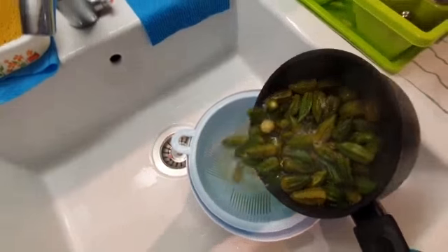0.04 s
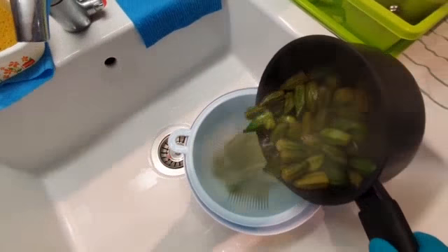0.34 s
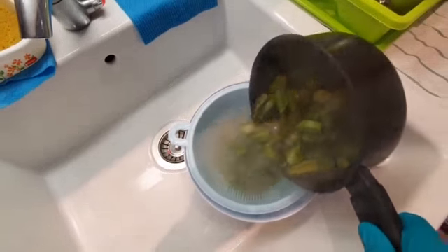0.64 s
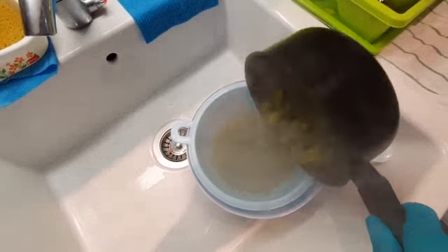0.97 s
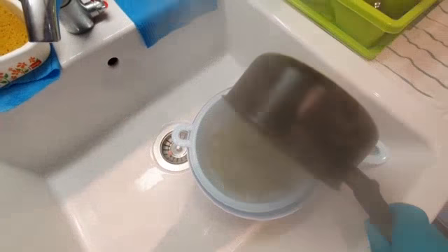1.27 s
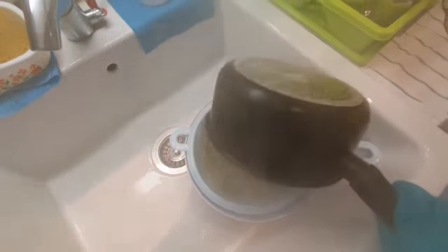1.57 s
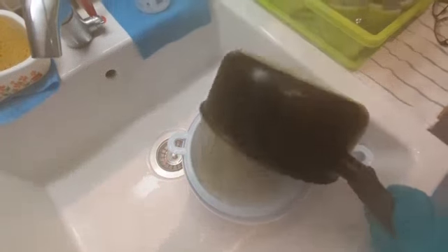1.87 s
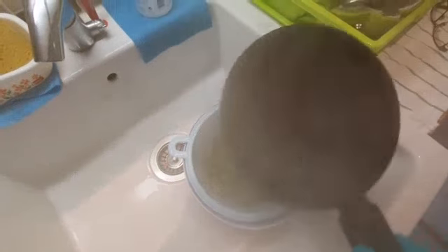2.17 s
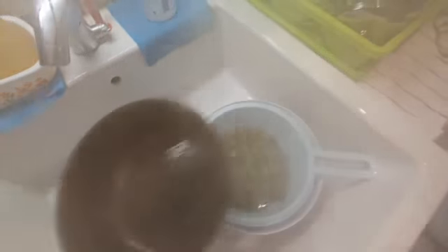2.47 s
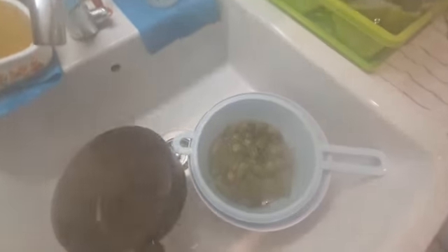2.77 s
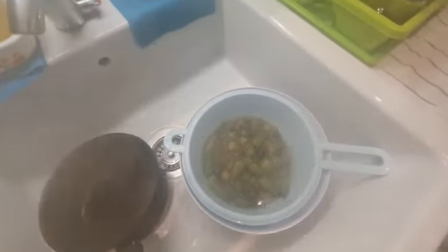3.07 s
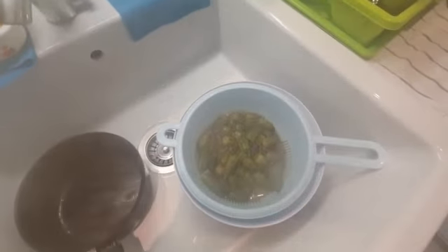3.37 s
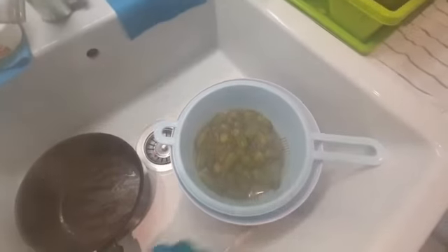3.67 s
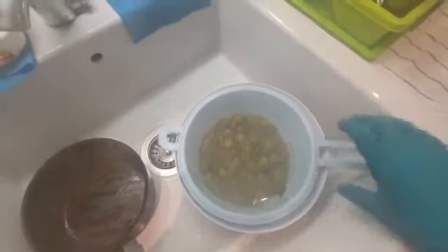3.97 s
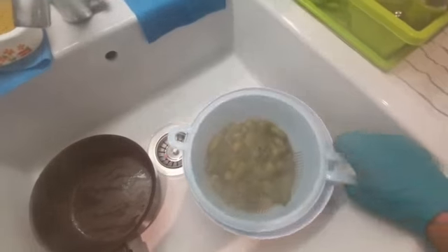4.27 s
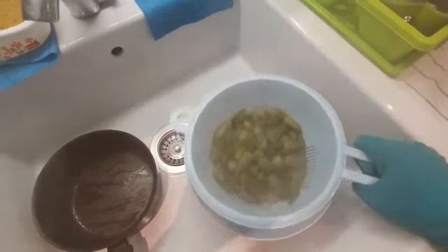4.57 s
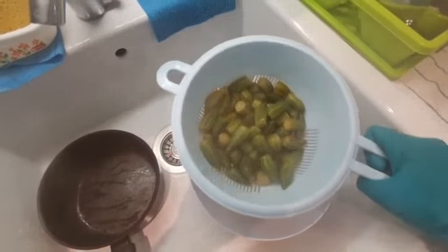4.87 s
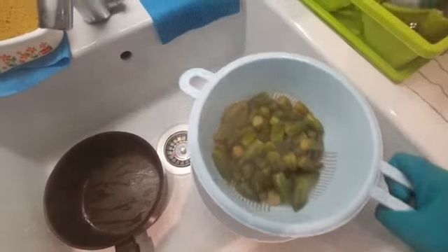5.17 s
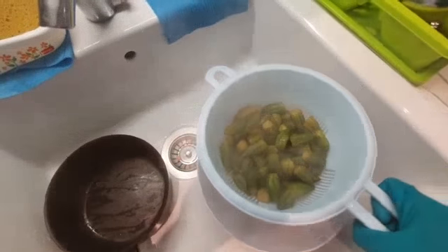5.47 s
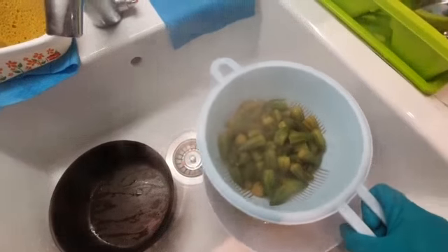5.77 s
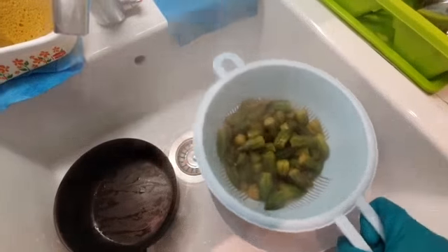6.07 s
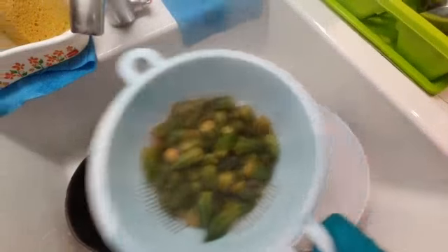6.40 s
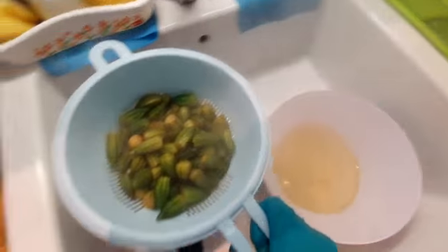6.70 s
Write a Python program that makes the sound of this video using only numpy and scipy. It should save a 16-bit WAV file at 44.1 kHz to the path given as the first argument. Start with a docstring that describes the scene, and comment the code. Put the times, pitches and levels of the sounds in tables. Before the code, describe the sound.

A wet, sloppy pour drums into plastic, followed by one loud pan clang and hollow plastic knocking and rattling with more dribbling water.

```python
"""A kitchen sink: hot water and boiled vegetables slide from a pan into a plastic colander, splashing,
bubbling and drumming in the bowl beneath. The hot pan hisses faintly as it swings aside and is set down
with a clang. The colander knocks on the bowl as it is lifted and shaken, and more water patters out.
The basin throws back close echoes; a small kitchen hums behind."""
import sys
import numpy as np
from scipy import signal
from scipy.fft import rfft, irfft
from scipy.io import wavfile
from scipy.ndimage import uniform_filter1d

SR = 44100
rng = np.random.default_rng(int(sys.argv[2]) if len(sys.argv) > 2 else 0)


def store_wav(level_fs):
    """Save 16-bit WAV to argv[1]."""
    pcm = np.round(np.clip(np.atleast_2d(level_fs), -1, 1) * 32767)
    wavfile.write(sys.argv[1], SR, pcm.T.astype(np.int16))


N = 297234
TIME = np.arange(N) / SR
SIDE = np.array([[1], [-1]])  # opposite polarity left and right
DRUM_LOW_HZ = 267  # the bowl radiates little below this

# EQ curves of splashing, the drummed bowl, fine spray and thudding vegetables: f/Hz, level/dB
SPLASH_EQ = [(530, -40.5), (900, -19), (1050, -23), (1180, -11.5), (1630, 0), (1770, -4.5), (2180, -8.5),
             (2750, -4), (3400, -5.5), (5600, -19.5), (7000, -21), (9100, -54), (15400, -120)]
DRUM_EQ = [(76, -42), (130, 2.5), (215, -8), (295, -9), (328, -21), (421, -9), (506, -2.5), (562, -0.5),
           (690, 2.5), (884, -20.5), (1300, -10), (1690, -38.5), (2860, -120)]
SPRAY_EQ = [(2940, -19.5), (5000, -5), (6930, -7), (7900, 0.5), (9010, 1.5), (11800, -7), (14200, -7),
            (16000, -11.5)]
THUD_EQ = [(110, -15.5), (170, 1), (230, -3.5), (300, -2.5), (420, -6.5), (600, -20.5), (1500, -59)]


def undb(db):
    """Decibels to gain."""
    return 10 ** (np.asarray(db) / 20)


def unit(x):
    """Scale to rms 1."""
    return x / np.sqrt(np.mean(x ** 2))


def fade(t60, t):
    """A decay of 60 dB in t60 seconds."""
    return np.exp(-np.log(1000) * t / max(t60, 1e-4))


def add(out, s, x):
    """Mix a short stereo sound in at time s."""
    i = max(int(s * SR), 0)
    out[:, i:i + x.shape[1]] += x[:, :N - i]


def through(x, response):
    """Pass a sound through an impulse response."""
    return signal.fftconvolve(np.atleast_2d(x), np.atleast_2d(response), axes=1)[:, :x.shape[-1]]


def highpass(x, hz, order=2):
    """Roll off the lows."""
    return signal.sosfilt(signal.butter(order, hz, "high", fs=SR, output="sos"), x)


def lowpass(x, hz, order=2):
    """Roll off the highs."""
    return signal.sosfilt(signal.butter(order, hz, fs=SR, output="sos"), x)


def colour(x, points, size=4096):
    """Minimum-phase EQ of unit power through points of f/Hz, level/dB."""
    hz, db = np.transpose(points)
    bin_hz = np.arange(size // 2 + 1) * SR / size
    gain = undb(np.interp(np.log(bin_hz + 1), np.log(hz), db))
    cepstrum = irfft(np.log(gain))
    cepstrum[1:size // 2] *= 2
    cepstrum[size // 2 + 1:] = 0
    response = irfft(np.exp(rfft(cepstrum)))
    return through(x, response / np.linalg.norm(response))


def sides(left_db):
    """Stereo gains with the left channel left_db above the right."""
    return undb(SIDE * left_db / 2)


def walk(rate):
    """Smooth random wander of rms 1, with rate steps a second."""
    k = int(SR / rate)
    steps = np.repeat(rng.standard_normal(N // k + 1), k)
    return unit(uniform_filter1d(uniform_filter1d(steps, k), k)[:N])


def ring(modes, apart_hz, tilt_db=0, length=1, size=36000, waver=None, balance=None):
    """Struck modes, tilted by tilt_db an octave; left and right part in phase, fully at apart_hz."""
    t, out = TIME[:size], 0
    for hz, db, t60 in modes:
        skew = min(hz / apart_hz, 1) * np.pi / 4 * rng.choice([-1, 1]) * SIDE
        clock = t
        if waver is not None:
            depth, rate = waver
            wander = np.interp(t * rate, np.arange(100), rng.standard_normal(100))
            clock = t + depth * np.cumsum(wander) / SR
        place = 1 if balance is None else sides(np.interp(hz, *np.transpose(balance)))
        envelope = undb(db + tilt_db * np.log2(hz / 1e3)) * fade(t60 * length, t)
        out = out + place * envelope * np.sin(2 * np.pi * hz * clock + skew)
    return out


def burst(t60, like, size=24000):
    """A decaying noise burst, from wide (like=0) to mono (like=1)."""
    mid, side = rng.standard_normal((2, size))
    return (mid + (1 - like) * side * SIDE) * fade(t60, TIME[:size])


def drops(rate, spread_db, scatter):
    """Random impacts, a few much harder than the rest, scattered from left to right."""
    chance, size = rng.random(N), rng.exponential(size=N)
    sign, place = rng.choice([-1, 1], N), rng.standard_normal(N)
    hits = (chance < rate / SR) * sign * undb(spread_db * np.minimum(size, 4))
    local_rms = np.sqrt(np.maximum(uniform_filter1d(hits ** 2, SR // 8), 1e-3))
    return hits / local_rms * (1 + scatter * place * SIDE)


def kitchen(hum_hz=48.3, drone_hz=95.1):
    """Room tone, a motor hum and a low, wavering drone with its rumble."""
    # room tone: f/Hz, level/dB
    room_eq = [(15, -40), (25, -12), (92, -2.5), (111, -2), (175, -21), (229, -13.5), (373, -28),
               (531, -30), (1130, -38.5), (1560, -34), (2220, -53.5), (3160, -43), (5430, -65.5),
               (9840, -52.5), (16000, -63.5)]
    # drone fader, one list before and one after the pan is set down: t/s, level/dB
    drone_fader = [
        [(0.0, -43), (0.33, -51.5), (0.83, -42), (1.68, -45), (2.42, -42), (2.52, -45), (3.4, -48.5)],
        [(4.05, -51), (4.52, -58), (4.69, -57), (4.99, -55), (5.35, -53.5), (6.02, -47.5), (6.74, -50)],
    ]
    rumble_eq = [(30, -37), (65, -6.5), (100, 2), (130, -18.5), (300, -25.5), (900, -41.5),
                 (3000, -65.5)]
    mid, side = rng.standard_normal((2, N))
    width = highpass(colour(side, room_eq), hz=330, order=1) * SIDE
    air = undb(-51.7 + .8 * walk(6.5)) * (colour(mid, room_eq) + width)
    wavering_hz = drone_hz + 4 * walk(4) + 2.45 * walk(15)
    drone = np.sin(2 * np.pi * np.cumsum(wavering_hz) / SR) * undb(5.5 + 2.5 * walk(14))
    rumble = undb(1) * colour(rng.standard_normal(N), rumble_eq)
    hum = undb(-48) * np.sin(2 * np.pi * hum_hz * TIME)
    fader = undb(np.interp(TIME, *np.concatenate(drone_fader).T))
    return air + hum + fader * (drone + rumble)


def flows():
    """Splash, drum and spray envelopes: each gush swells, sags as the water runs out, then dies."""
    # first water over the lip, main pour, dregs, lifted colander draining: start/s, rise/s, end/s,
    # level/dB, sag/(dB/s), release/(dB/s), drum/dB and spray/dB relative to the splash
    gushes = [(-0.03, 0.027, 0.51, -43, 11, 152.5, -7, -10),
              (.44, 0.064, 1.37, -31.5, 16, 54.5, -1.5, -14.5),
              (1.51, 0.021, 1.794, -52.5, 3.5, 74.5, 7.5, -5),
              (5.058, 0.082, 5.464, -43, 8, 37.5, 8.5, -9.5)]
    splash = drum = spray = 0
    for start, rise, end, db, sag, release, drum_db, spray_db in gushes:
        swell = np.clip((TIME - start) / rise, 0, 1)
        poured_s = np.clip(TIME - start, 0, end - start)
        flow = swell * undb(db - sag * poured_s - release * np.maximum(TIME - end, 0))
        splash = splash + flow
        # as water collects in the bowl, drumming and spray gain on the splashing
        drum = drum + flow * undb(drum_db + 4 * poured_s)
        spray = spray + flow * undb(spray_db + 9.5 * poured_s)
    return splash, drum, spray


def bubbles(low_hz, high_hz, cycles, glide, spread_db, count=2200, size=1200):
    """Trapped air rings and rises in pitch as it nears the surface; more cycles give a longer ring."""
    out, t = np.zeros((2, N)), TIME[:size]
    for when, pitch, strength, place, lag in rng.random((count, 5)):
        hz = low_hz * (high_hz / low_hz) ** pitch
        age = t * hz / cycles
        phase = 2 * np.pi * hz * t * (1 + glide * np.minimum(age, 2))
        wave = np.sin(phase + (2 * lag - 1) * SIDE) * fade(0.52, age)
        gain = undb(-spread_db * np.log(strength + 0.029))
        add(out, when * N / SR, wave * gain * sides(10 * (place - .5)))
    return unit(out)


def water(splash, drum, spray):
    """The stream splashes, bubbles, gurgles and drums in the bowl and throws spray over a faint crackle."""
    # a faint, fine treble crackle swells and fades: fullest t/s, level/dB, rise/(dB/s), fall/(dB/s)
    crackle_swells = [(2.349, -72, 7.5, 15), (5.3, -59.5, 18.5, 15)]
    surge = undb(walk(30) - 1.5)  # the stream breaks into gouts
    splash, drum, spray = splash * surge, drum * surge, spray * surge
    patter = undb(-1.5) * colour(drops(rate=420, spread_db=2.5, scatter=1), SPLASH_EQ)
    fizz = undb(-4.5) * bubbles(1210, 3905, cycles=34, glide=0.064, spread_db=7.5)
    gurgle = undb(-4.5) * bubbles(474.5, 1270, cycles=13, glide=0.1, spread_db=3, count=700, size=2400)
    drumming = colour(drops(rate=530, spread_db=5, scatter=0.12), DRUM_EQ)
    drumming = undb(-1) * highpass(drumming, DRUM_LOW_HZ)
    thuds = undb(-15.5) * colour(drops(rate=73, spread_db=3.5, scatter=0.15), THUD_EQ)
    mist = undb(-1) * colour(drops(rate=280, spread_db=3, scatter=1), SPRAY_EQ)
    swell = sum(undb(db - np.maximum(rise * (s - TIME), fall * (TIME - s)))
                for s, db, rise, fall in crackle_swells)
    crackle = swell * undb(-4) * colour(drops(rate=640, spread_db=3.5, scatter=1), SPRAY_EQ)
    return splash * (patter + fizz + thuds) + drum * (gurgle + drumming) + spray * mist + crackle


def contacts(rebound_db=-3.5, rattle_gap_s=.016):
    """Knocks, ever weaker rebounds and loose rattle, as t/s, level/dB, click/dB, tilt/(dB/octave)."""
    # colander on bowl: t/s, level/dB, relative click/dB, tilt/(dB/octave), rebounds, rebound gap/s
    hits = [(0.048, -25.5, -11, -1, 0, 0), (1.713, -28, -22, 6, 0, 0), (1.766, -23.5, -17, 1.5, 0, 0.0014),
            (3.807, -2.5, -35.5, -3.5, 0, 0), (3.828, -19, -13, -1, 1, 0.02),
            (4.593, -25.5, -16, 3, 0, 0.0018), (4.61, -20.5, 0.5, -11, 0, 0), (4.670, -12, -15, 4, 0, 0),
            (4.7683, -11, -10.5, 8, 1, .008), (4.782, -5, -24, 0, 0, 0), (4.812, -4.5, -25, 4, 1, 0.0096),
            (4.849, -11, -22, -5.5, 0, 0), (4.862, -1.5, -24, 4, 0, 0.0022),
            (4.893, -5.5, -25, 1, 1, 0.0047), (4.944, -4.5, -23, -3, 0, 0), (4.966, -10, -19, -2, 1, .0055),
            (5.121, -15.5, -17, -10, 0, 0.0046), (5.173, -12, -11, -7, 0, 0), (5.198, -10, -6, 4, 0, 0),
            (5.743, -28, -39, -11, 0, 0), (5.902, -6, -3.5, -2.5, 0, 0.0032),
            (5.917, -3.5, -33, -7, 1, .014), (5.954, -2.5, -22, -1.5, 0, 0),
            (5.963, -3.5, -25.5, -4, 1, 0.0074), (6.076, -11, -21.5, -5, 0, 0.0041),
            (6.091, -11.5, -24, -7, 1, .008), (6.130, -16.5, -21, 1.5, 1, 0.012),
            (6.533, -25, -30.5, 2.5, 1, 0.012), (6.569, -23.5, -31, 1, 1, 0.016), (6.6, -25, -27, -6, 0, 0),
            (6.62, -23.5, -26, 3.5, 1, 0.018)]
    # the loose colander rattling on: start/s, end/s, level/dB
    rattles = [(4.771, 5.02, -24.5), (5.911, 6.02, -21.5), (6.073, 6.19, -32.5)]
    blows = [(s + k * gap, db + k * rebound_db, click_db, tilt_db)
             for s, db, click_db, tilt_db, rebounds, gap in hits for k in range(rebounds + 1)]
    for start, end, db in rattles:
        gaps, sizes = rng.random((40, 2)).T
        times = start + np.cumsum(rattle_gap_s * (.5 + gaps))
        blows += [(s, db + 3 * (2 * size - 1), -14.5, -1) for s, size in zip(times, sizes) if s < end]
    return blows


def knocks():
    """Plastic on plastic: a click, a few hollow cycles of the bowl, and the basin booming underneath."""
    # bowl modes, base and wall swinging against each other: f/Hz, level/dB, t60/s, polarity
    bowl_modes = [(390.4, -30, 0.24, 1), (524, -9.5, 0.075, 1), (562.7, -1.5, 0.042, 1),
                  (640, -10, 0.042, -1), (684, -6, 0.06, -1), (676, -24.5, 0.22, -1), (941, -16.5, 0.06, 1),
                  (1078, -17.5, 0.059, -1), (1252, -21.5, 0.043, 1)]
    # the bowl rings lower and longer under the colander's full weight: t/s, pitch ratio, decay ratio
    bowl_load = [(4.9, 1.005, 1.06), (5.9, .985, 1.61)]
    # basin modes: f/Hz, level/dB, t60/s
    basin_modes = [(86, 2, 0.23), (103.8, -1.5, 0.38), (145, -19, 0.77), (161.6, -2, 0.11)]
    # contact click: f/Hz, level/dB
    click_eq = [(300, -15), (1000, 3.5), (1700, 3), (2600, -2), (3500, -4.5), (5000, -22), (9000, -27.5),
                (16000, -38)]
    # weight landing on the basin (last vegetables, pan tipping flat, full colander): t/s, level/dB
    landings = [(1.888, -28.5), (3.822, -15), (5.905, -21.5), (6.09, -30.5), (6.611, -29.5)]
    out, t = np.zeros((2, N)), TIME[:18000]
    basin = ring(basin_modes, apart_hz=2010, size=len(t)) * (1 - fade(0.088, t))  # heavy, slow to speak
    push = (1 - fade(0.0046, t)) ** 2  # the soft contact rounds the attack
    times, pitches, lengths = np.transpose(bowl_load)
    for s, db, click_db, tilt_db in contacts():
        # the shifting vegetables detune the bowl
        pitch = np.interp(s, times, pitches) + .012 * rng.standard_normal()
        length = np.interp(s, times, lengths)
        bowl = 0
        for hz, mode_db, t60, polarity in bowl_modes:
            mode = (hz * pitch, mode_db + tilt_db * np.log2(hz / 600), t60)
            bowl = bowl + polarity * ring([mode], apart_hz=3000, length=length, size=len(t))
        bowl = highpass(push * bowl, hz=330)  # a small bowl radiates little bass
        add(out, s - .0007, undb(db - 5.5) * bowl * sides(1))
        add(out, s, undb(db - 29 + 4 * rng.standard_normal()) * basin)
        click = colour(burst(t60=0.093, like=0.043, size=8000), click_eq)
        add(out, s, undb(db + click_db - 9.5) * click * sides(1))
    for s, db in landings:
        add(out, s, undb(db) * basin)
    return out


def slaps():
    """Soft wet pieces land: a sharp smack, a thump of the bowl, a low thud and a gritty spit of spray."""
    # the biggest pieces and gulps of water: t/s, level/dB, relative spray/dB, relative thump/dB
    pieces = [(0.1359, -19, -13.5, -23), (0.2878, -22, -10, -10.5), (0.4518, -11, -21, -7.5),
              (0.5668, -13.5, -7, -2), (0.6, -11.5, -13, -3), (0.65, -5, -15, -12),
              (0.728, -9.5, -10.5, -13.5), (0.856, -13.5, -9.5, -7.5), (0.8708, -11.5, -10, -11.5),
              (0.8829, -10.5, -10.5, -7), (0.918, -22, -2, -10), (0.954, -14.5, -3.5, -4),
              (0.963, -17, -9, 0), (1.011, -15.5, -6, -6), (1.0218, -11.5, -14, -0.5), (1.128, -20, -14, 0),
              (1.1493, -20, -4.5, 4.5), (1.212, -25.5, -4.5, 9), (1.23, -22, -8, 6),
              (1.245, -20.5, -8.5, -2), (1.337, -22, -1, 3), (1.357, -35, -1, 4), (1.374, -24, -1.5, -2),
              (1.383, -25, -5.5, 5.5), (1.469, -35.5, 5, -1), (1.53, -30.5, -16.5, 11.5),
              (1.5943, -20, -0.5, 2), (1.713, -25, -16.5, 6.5), (5.132, -22, -21, -1),
              (5.1696, -18, -9.5, -5), (5.199, -11.5, -15, -2.5), (5.3766, -22.5, -31, -8),
              (5.403, -21.5, 3.5, -3.5), (5.421, -18.5, -17.5, -2), (5.441, -20, -11, -3),
              (5.285, -28, -24, -5), (5.475, -20, -14, -17), (5.551, -35, -21, 2), (5.705, -32, -8, -8),
              (5.82, -31.5, -8, -3)]
    out = np.zeros((2, N))
    for s, db, spray_db, thump_db in pieces:
        own_eq = [(hz, band_db + 4.5 * rng.uniform(-1, 1)) for hz, band_db in SPLASH_EQ]
        tail = undb(-15.5) * burst(t60=0.067, like=0.21)
        snap = undb(-6.5) * burst(t60=0.0064, like=0.32)
        smack = colour(snap + tail, own_eq)
        pitch = np.exp(0.05 * rng.standard_normal())  # each size of piece thumps at its own pitch
        thump = colour(burst(t60=0.061, like=0.28), np.array(DRUM_EQ) * [pitch, 1])
        thud = undb(-15.5) * colour(burst(t60=0.13, like=0.38), THUD_EQ)
        body = undb(thump_db - 9) * (highpass(thump, DRUM_LOW_HZ) + thud)
        mist = burst(t60=0.046, like=0.14)
        droplets = mist * rng.exponential(size=mist.shape[1]) ** 1.607
        spit = undb(spray_db - 17.5) * colour(droplets, SPRAY_EQ)
        add(out, s, undb(db) * (smack + body + spit))
    return out


def plops(flow, per_s=42, full_flow_db=-44, low_hz=951, high_hz=3763, count=220):
    """Single bubbles ring and bend in pitch; small random ones thin out and soften as the flow drops."""
    # the largest bubbles and the last drips: t/s, level/dB, f/Hz
    large = [(0.556, -20.5, 733), (0.568, -12.5, 1590), (0.5816, -17.5, 1520), (1.02, -15, 724),
             (1.719, -17, 535), (5.0862, -34, 3230), (5.111, -35, 1730), (5.161, -17.5, 1220),
             (5.2857, -25, 3180), (5.313, -25, 1990), (5.3778, -28.5, 1895), (5.38, -25.5, 3225),
             (5.467, -25.5, 1250), (5.4902, -24.5, 1210), (5.551, -32, 1190), (5.591, -32.5, 2580),
             (5.765, -34.5, 2660), (5.829, -32.5, 3210)]
    out, t = np.zeros((2, N)), TIME[:3000]
    running = np.minimum(flow / undb(full_flow_db), 1)
    starts = np.flatnonzero(rng.random(N) < per_s * running / SR)
    small = []
    for i, (strength, pitch) in zip(starts, rng.random((count, 2))):
        db = -38.5 + 10 * np.log10(running[i]) + 4 * (2 * strength - 1)
        small.append((TIME[i], db, low_hz * (high_hz / low_hz) ** pitch))
    places, chirps = rng.uniform(-1, 1, count), rng.uniform(-1.5, 3.2, count)
    for (s, db, hz), place, chirp in zip(large + small, places, chirps):
        # the bubble breaks up: a weaker, detuned twin follows
        twin = (.005 * rng.uniform(0.46, 2), -8, np.exp(0.19 * rng.uniform(-1, 1)))
        for delay, weaker_db, ratio in [(0, 0, 1), twin]:
            envelope = fade(rng.uniform(0.014, 0.035), t) * (1 - fade(0.002, t))
            wave = np.sin(2 * np.pi * hz * ratio * (t + chirp * t ** 2))
            add(out, s + delay, undb(db + weaker_db - 1) * envelope * wave * sides(4 * place))
    return out


def squelches(roughness=.16, glide_per_s=4, attack_s=0.02, size=8000):
    """Wet pieces slide together: a rough, short resonance glides as the hollow between them changes."""
    # soft vegetables tumbling, each closing a wet hollow: t/s, level/dB, f/Hz, t60/s
    hollows = [(0.272, -32.5, 1650, 0.051), (0.405, -30.5, 1640, 0.049), (0.572, -22, 1740, .07),
               (1.031, -28.5, 1295, 0.075), (1.075, -30.5, 670, .08), (1.148, -31, 690, 0.061),
               (1.278, -30, 670, 0.042), (1.571, -29, 524, 0.038), (1.628, -33, 650, .06),
               (1.835, -39.5, 543, .07), (1.653, -34.5, 1574, 0.073), (1.679, -33, 1020, 0.084),
               (1.712, -31.5, 860, 0.084), (1.768, -40, 1143, .07), (1.803, -44, 1010, 0.065),
               (1.887, -40, 1490, 0.057), (1.933, -35.5, 1197, 0.044), (5.463, -34.5, 1590, 0.089),
               (5.604, -33.5, 1086, 0.052), (5.652, -36.5, 1450, 0.057)]
    out, t = np.zeros((2, N)), TIME[:size]
    for s, db, hz, t60 in hollows:
        grain = lowpass(rng.standard_normal((3, 2 * size)), roughness * hz, order=3)[:, size:]
        phase = 2 * np.pi * hz * t * (1 + glide_per_s * rng.uniform(-1, 1) * t / 2)
        wave = unit(unit(grain[0]) * np.sin(phase) + 0.57 * unit(grain[1:]) * np.cos(phase))
        add(out, s, undb(db + 2) * wave * fade(t60, t) * (1 - fade(attack_s, t)))
    return out


def rubs():
    """Pan, colander and rubber glove brush past things: faint noise swells, each with its own pitch."""
    # brush strokes: centre t/s, half length/s, level/dB, f/Hz
    strokes = [(2.044, 0.019, -59, 2490), (2.462, 0.08, -67.5, 3000), (2.793, 0.052, -67.5, 3270),
               (4.27, 0.02, -67.5, 5000), (4.405, 0.0076, -57, 1590), (4.427, 0.02, -52.5, 670),
               (4.543, 0.018, -61.5, 1580), (4.613, 0.0066, -34, 1480), (4.679, 0.054, -42.5, 1530),
               (4.687, 0.083, -67, 9500), (6.488, .05, -68, 8500), (6.604, .055, -43.5, 480)]
    out = np.zeros((2, N))
    for s, half, db, hz in strokes:
        t = TIME[:int(6 * half * SR)] - 3 * half
        grain = rng.standard_normal((2, SR * 2))[:, :len(t)]
        stroke_eq = [(hz / 4, -22), (hz, -10), (hz * 1.8, -17), (hz * 4, -32), (hz * 16, -75)]
        add(out, s - 3 * half, undb(db) * colour(grain, stroke_eq) * np.exp(-(t / half) ** 2))
    return out


def sizzle(start_hz=4500, end_hz=3400, centre_s=2.623, half_s=0.16):
    """A faint hiss sputters and sinks in pitch as the hot pan is swung aside."""
    hz = np.interp(TIME, [centre_s - half_s, centre_s + half_s], [start_hz, end_hz])
    hz *= 1 + .02 * walk(35)
    flutter = colour(rng.standard_normal((2, N)), [(120, -4), (400, -11.5), (1500, -19.5), (3000, -51)])
    sputter = undb(-65 + 5.5 * walk(45.1))
    swell = np.exp(-((TIME - centre_s) / half_s) ** 2)
    return swell * sputter * flutter * np.sin(2 * np.pi * np.cumsum(hz) / SR)


def pan(flare_hz=862, flare_s=.04, settles_s=3.85):
    """The metal pan clangs and buzzes against the sink, then falls silent as it settles flat."""
    # pan on sink, its pitch dropping as it lies flat:
    # t/s, level/dB, tilt/(dB/octave), decay ratio, pitch ratio
    hits = [(2.775, -48.5, -1.5, 2, 1), (2.97, -53.5, -1.5, 2, 1), (3.428, 2, 2, 1.3, 1),
            (3.77, -22.5, 8.5, 0.28, 1), (3.814, -17, 10.5, 0.18, 0.97), (3.824, -18, 7, 0.73, 0.95),
            (3.848, -18, 8.5, 0.23, 0.95), (3.863, -17.5, 7, 0.47, 0.98)]
    # modes of the free pan: f/Hz, level/dB, t60/s
    pan_modes = [(546, -22, 0.53), (677, -26, 1), (748, -17.5, 0.43), (812, -23, 0.55), (862, -14.5, 0.49),
                 (920, -21, 0.6), (1112, -14, 0.19), (1260, -22.5, 0.35), (1373, -21.5, 0.3),
                 (1580, -26.5, 0.35), (1704, -12.5, 0.33), (1780, -20.5, 0.13), (2000, -30.5, 0.17),
                 (2300, -31.5, 0.28), (2682, -17, 0.29), (2850, -31.5, .25), (3120, -32, 0.25),
                 (3490, -24, 0.2), (3880, -26.5, 0.31), (4645, -28.5, 0.21), (5510, -40, 0.18),
                 (6013, -40.5, .2), (6570, -37, 0.22), (7100, -38.5, 0.22), (8480, -39, 0.19),
                 (9370, -43.5, 0.18), (9775, -41, 0.23), (11290, -46, 0.21), (13090, -52.5, 0.21)]
    # the pan lies to the left and radiates mostly that way: f/Hz, left minus right/dB
    balance = [(600, -1.5), (860, 2), (1100, 8), (1700, 7), (2700, 3), (4600, -2), (9000, 3.5)]
    # attack of the clang: f/Hz, level/dB
    clang_eq = [(180, -69), (300, -34.5), (560, -13), (762, -10.5), (870, -2), (1010, -25.5), (1100, -23.5),
                (1750, -12.5), (2480, -42), (2740, -18.5), (2880, -26), (4700, -31), (7820, -46),
                (10000, -40), (16000, -55)]
    sink_eq = [(300, -25.5), (520, -5), (830, 9), (1000, -4.5), (1700, -6), (2200, -16.5),
               (4000, -31.5), (9000, -58), (16000, -75.5)]
    rocking = (0.0023, 45)  # wavers the modes: share of pitch, wanders per second
    out, t = np.zeros((2, N)), TIME[:36000]
    for s, db, tilt_db, length, pitch in hits:
        tuned = [(hz * pitch, mode_db, t60) for hz, mode_db, t60 in pan_modes]
        tone = ring(tuned, apart_hz=2715, tilt_db=tilt_db, length=length, waver=rocking, balance=balance)
        add(out, s, undb(db - 8) * tone * (1 - fade(0.0055, t)))
        # the pan's strong 862 Hz ring flares and is quickly damped
        flare = np.sin(2 * np.pi * flare_hz * t) * np.exp(-(t / (flare_s * length)) ** 2)
        add(out, s, undb(db - 10) * flare * sides(8))
        # chatter at the contact keeps striking the modes, which broadens them
        chatter = burst(t60=0.47 * length, like=0.45)
        damped = ring(tuned, apart_hz=2700, tilt_db=tilt_db + 6, length=0.076, size=4000, balance=balance)
        add(out, s, undb(db - 34) * unit(lowpass(through(chatter, damped), hz=6000)))
        # the blow also rings the many close modes of the sink
        sink = colour(burst(t60=0.54 * length, like=0.3), sink_eq)
        add(out, s, undb(db - 20) * sink * sides(2))
        attack = colour(burst(t60=0.013, like=0.85), clang_eq)
        add(out, s, undb(db - 10.5) * attack * sides(2.8))
    settling = fade(.2, np.maximum(TIME - settles_s, 0))
    return highpass(out, hz=254) * settling


def scrape(start=3.81, end=3.873):
    """A short gritty slide over the wet sink."""
    grit_eq = [(200, 5.5), (500, 15), (1100, -22), (4000, -14), (6000, -19), (9000, -22.5),
               (16000, -29.5)]
    grit = colour(drops(rate=8800, spread_db=7, scatter=0.15), grit_eq)
    gate = np.interp(TIME, [start - .004, start, end, end + 0.011], [0, 1, 1, 0])
    return undb(-26.5) * grit * gate


def echoes(x, basin_db, room_db, size=30000):
    """Add close reflections off the basin walls, then the hard little kitchen, whose treble dies first."""
    t = TIME[:size]
    mid, side = rng.standard_normal((2, size))
    noise = mid + highpass(side, hz=700, order=1) * SIDE  # long waves reach both ears alike
    near = noise[:, ::-1] * fade(0.038, t) * (t > .0015)
    low = lowpass(noise, hz=2500)
    far = (low * fade(0.58, t) + (noise - low) * fade(0.53, t)) * (t > .008)
    response = (undb(basin_db) * unit(near) + undb(room_db) * unit(far)) / np.sqrt(size)
    return x + through(x, response)


def scene():
    """Water, plastic and metal, each with its own reverb send, over the hiss and the room tone."""
    splash, drum, spray = flows()
    pour = (water(splash, drum, spray) + slaps() + squelches() + plops(splash)) * undb(.5) * sides(2.4)
    wet = echoes(pour + scrape() + rubs(), basin_db=-3, room_db=-4.5)
    plastic = echoes(knocks(), basin_db=-12, room_db=-12.5)
    metal = echoes(pan(), basin_db=-15, room_db=-11)
    return wet + plastic + metal + sizzle() + kitchen()


def record(dry, threshold_db=-12, slope=0.52, attack_s=0.033, top_hz=16000):
    """The clang ducks the gain, which stays down; peaks clip, and sub-bass and top treble are cut."""
    x = highpass(dry, hz=27.5)
    step = 1 / (attack_s * SR)
    power = signal.lfilter([step], [1, step - 1], np.max(x ** 2, axis=0))
    reduction_db = slope * np.maximum(10 * np.log10(power + 1e-12) - threshold_db, 0)
    ducked = x * undb(-np.maximum.accumulate(reduction_db))
    high_cut = signal.ellip(10, .2, 70, top_hz, fs=SR, output="sos")
    return signal.sosfilt(high_cut, np.clip(ducked, -1, 1))


dry = scene()
out = record(dry)
store_wav(out)
```